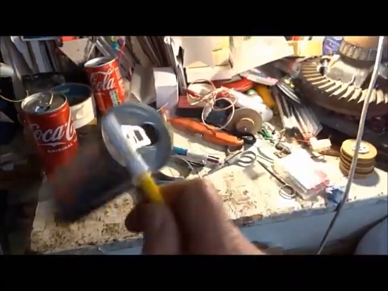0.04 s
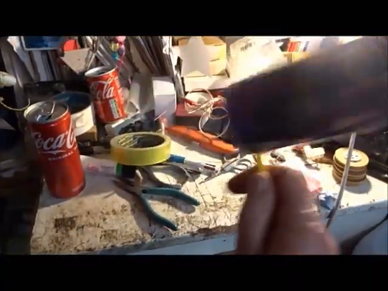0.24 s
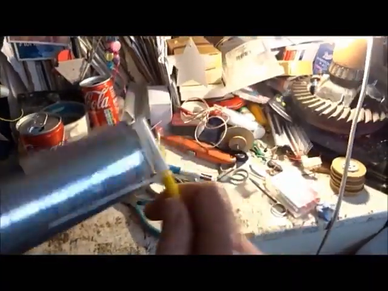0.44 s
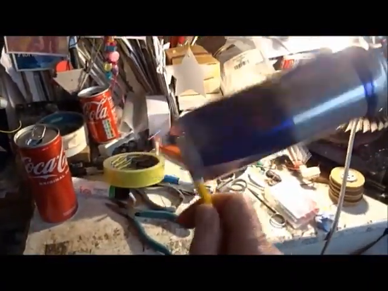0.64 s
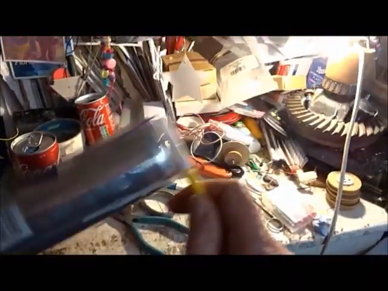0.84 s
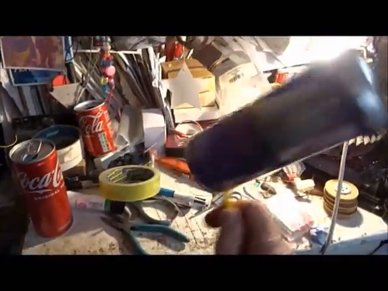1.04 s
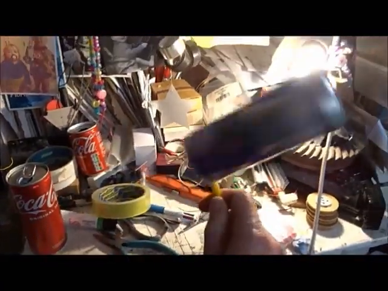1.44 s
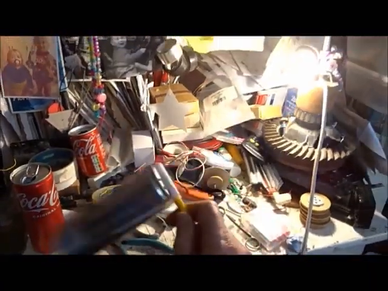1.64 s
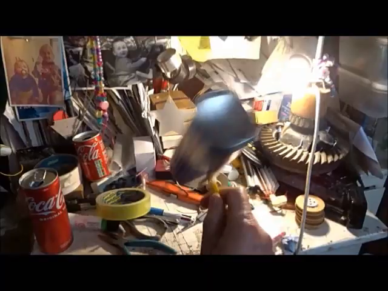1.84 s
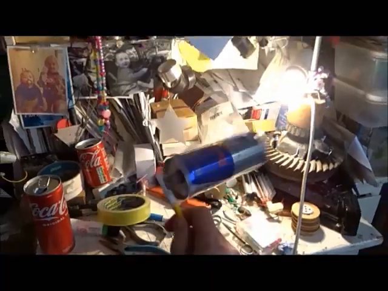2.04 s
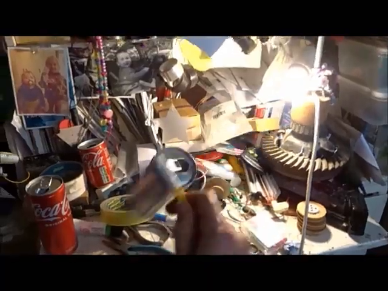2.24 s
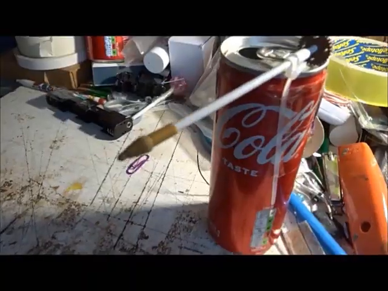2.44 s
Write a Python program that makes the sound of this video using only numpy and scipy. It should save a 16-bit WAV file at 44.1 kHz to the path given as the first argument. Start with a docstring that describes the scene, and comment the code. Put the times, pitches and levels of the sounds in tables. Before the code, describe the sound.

Rapid metallic clicking and rattling from an empty can whirled on a stick, close up.

```python
"""A faint workshop hiss, then a fast, tinny clatter: an empty drink can whirls on a stick over a bench.
The stick catches and slips at the can's tab about twenty times a second. Each slip is a snap, a short
chatter of contacts that sets the thin wall ringing and the air inside humming. The microphone is close,
so a limiter turns down the loud snaps. The sound is cut off while the can still spins."""
import sys
import numpy as np
from scipy import signal
from scipy.fft import rfft, irfft
from scipy.io import wavfile
from scipy.ndimage import uniform_filter1d, minimum_filter1d

SR = 44100
rng = np.random.default_rng(int(sys.argv[2]) if len(sys.argv) > 2 else 0)


def transcribe(signal):
    """Save signal, clipped to [-1, 1], as a 16-bit WAV file at the path in sys.argv[1]."""
    frames = np.atleast_2d(signal).T
    limited = np.clip(frames, -1, 1)
    pcm = np.round(limited * 32767).astype(np.int16)
    wavfile.write(sys.argv[1], SR, pcm)


N = 114660
TIME = np.arange(N) / SR
RING = 16384   # samples in the sound of one slip
AGE = np.arange(RING) / SR   # seconds since the slip
HZ = np.maximum(np.fft.rfftfreq(RING, 1 / SR), 1)


def from_db(db):
    """Turn decibels into a number to multiply by."""
    return 10 ** (np.asarray(db) / 20)


def at_hz(points, hz):
    """Read between a table's rows, giving every octave the same room."""
    f, value = np.transpose(points)
    return np.interp(np.log(hz), np.log(f), value)


def causal(gain):
    """A filter with these gains that makes no sound before it is struck (minimum phase)."""
    cepstrum = irfft(np.log(gain))
    cepstrum[1:RING // 2] *= 2
    cepstrum[RING // 2 + 1:] = 0
    return np.exp(rfft(cepstrum))


# The tone of the room's hiss. Each row: frequency in Hz, level in dB.
HISS_TONE = [(60, -36), (500, -17), (850, -12.5), (1480, -14), (1700, -1), (2000, -14), (3000, -21),
             (15000, -31)]

def workshop(level_db=-61):
    """Faint, steady hiss with a nasal middle."""
    shape = from_db(at_hz(HISS_TONE, np.maximum(np.fft.rfftfreq(N, 1 / SR), 1)))
    noise = irfft(rfft(rng.standard_normal((2, N))) * shape, N)
    return from_db(level_db) * noise / noise.std()


def swing(t, share, turns_per_s=2.4):
    """A shift in time that bends a pitch up and down by a small share, once a turn."""
    speed = 2 * np.pi * turns_per_s
    return share * np.sin(speed * t) / speed


def low_tones(strikes, tones, levels, jolt_rad):
    """All but the faintest slips top up the low tones and jolt their waves out of step."""
    out = np.zeros(N)
    kicks = 1.0 * (strikes > strikes.max() / 20)
    smooth = signal.butter(2, 70, fs=SR, output="sos")
    swung_time = TIME + swing(TIME, share=.009)
    for hz, db, ring_s in tones:
        swell = signal.lfilter([1], [1, -from_db(-60 / (ring_s * SR))], kicks + 1e-18)
        swell = swell ** .62   # evens out the slips and stretches the fade
        phase = np.cumsum(kicks * rng.normal(0, jolt_rad, N))
        envelope = signal.sosfilt(smooth, swell * np.exp(1j * phase))
        out += from_db(db) * np.real(envelope * np.exp(2j * np.pi * hz * swung_time))
    return from_db(np.interp(TIME, *np.transpose(levels))) * out


# The can's two lowest tones. Each row: pitch in Hz, level in dB, ring time in seconds before stretching.
HUM_TONES = [(335, -2, .33), (383, -6, .3)]
# The hum swells and sinks as the can swings. Each row: time in seconds, level in dB.
HUM_SWELLS = [(0.26, -56.5), (0.532, -46), (0.73, -52), (0.819, -48), (1.12, -56), (1.17, -71),
              (1.23, -52.5), (1.549, -58.5), (1.82, -52), (2.0, -59.5), (2.33, -58.5)]

def hum(strikes):
    """The air inside hums with two hollow tones that beat against each other."""
    return low_tones(strikes, HUM_TONES, HUM_SWELLS, jolt_rad=.8)


# The flexing wall's tones. Each row: pitch in Hz, level in dB, ring time in seconds before stretching.
FLEX_TONES = [(610, -12, .12), (1503, -7, .15), (1528, -1, .16)]
# Short swells of the flexing. Each row: time in seconds, level in dB.
FLEX_SWELLS = [(.25, -54), (.41, -42.5), (.56, -56.5), (.73, -57.5), (.81, -41.5), (.87, -58), (0.951, -47),
               (1.13, -65.5), (1.219, -52), (1.4, -57.5), (1.521, -75.5), (2.03, -69), (2.259, -57)]

def flex(strikes):
    """The wall flexes slowly, giving one lower tone and a beating pair."""
    return low_tones(strikes, FLEX_TONES, FLEX_SWELLS, jolt_rad=1.8)


def tint(hz, body_db, treble_db):
    """One slip's own tone: more or less body (2200 to 4800 Hz) and treble (from 8000 Hz up)."""
    corners_hz = [900, 2200, 4800, 5400, 7200, 8000]
    return from_db(np.interp(hz, corners_hz, [0, body_db, body_db, 0, 0, treble_db]))


def treble_bumps(width_hz=90, depth_db=3.8):
    """Narrow peaks and dips in the treble: every slip favours other weak tones of the wall."""
    size = int(width_hz * RING / SR)
    bumps = uniform_filter1d(uniform_filter1d(rng.standard_normal(len(HZ)), size), size)
    gain = from_db(depth_db * bumps / bumps.std())
    gain /= np.sqrt(np.mean(gain ** 2))
    return gain ** np.clip(HZ / 3000, 0, 1)   # shallower towards the bass


# The wash of the wall's weak tones. Each row: frequency in Hz, level in dB.
SHIMMER_TONE = [(62, -43.5), (225, -39.5), (325, -24.5), (490, -33.5), (820, -53), (1130, -27), (1400, -42),
                (2460, -15.5), (3360, -17), (3910, -5.5), (4810, -9.5), (5610, 1), (6610, -1), (7710, -7),
                (9310, -6), (12000, -13.5), (15400, -23)]
# How long the wash rings. Each row: frequency in Hz, seconds to fade by 60 dB.
SHIMMER_FADES = [(210, 0.27), (1450, 0.35), (5500, 0.28), (14100, 0.24)]
# How wide it sounds. Each row: frequency in Hz, level of the sides against the middle in dB.
SHIMMER_WIDTH = [(500, -14), (2350, 2.5), (4250, -4.5), (7100, -13), (14100, -25)]

def shimmer(colour, level_db=-4):
    """Countless weak wall tones and bench echoes blur into a wash whose top fades first."""
    shape = from_db(at_hz(SHIMMER_TONE, HZ))
    shape = from_db(level_db) * shape / np.sqrt(np.mean(shape ** 2))
    mid, side = rfft(rng.standard_normal((2, RING))) * shape * colour
    side *= from_db(at_hz(SHIMMER_WIDTH, HZ))
    ears = np.array([mid + side, mid - side])
    centres_hz, fades_s = np.transpose(SHIMMER_FADES)
    out = 0
    for one_band, fade_s in zip(np.eye(len(fades_s)), fades_s):
        band = np.interp(np.log(HZ), np.log(centres_hz), one_band)
        out += irfft(ears * band) * from_db(-60 * AGE / fade_s)
    return out


# The wall's clear tones. Each row: pitch in Hz, level in dB, seconds to fade by 60 dB.
WALL_TONES = [(2834.5, -15.5, 0.17), (3827, -17.5, 0.16), (4007, -19, 0.15), (4247, -17.5, 0.13),
              (4910, -23, 0.13), (5610, -9.5, 0.12), (6573, -4, 0.2), (6670, -14.5, 0.3),
              (6800, -18.5, 0.12), (7820, -17, 0.21), (9464, -18, 0.19), (11030, -20, 0.25)]
# The first tone comes and goes as the can turns. Each row: time in seconds, extra level in dB.
FIRST_TONE_SWELLS = [(.42, -15), (.49, 2), (.68, 3.5), (.85, -6.5), (1.03, 5), (1.14, -14), (1.21, 6),
                     (1.29, 0.5), (1.52, 9.5), (1.69, 4.5), (1.74, -2.5), (2.18, -9), (2.25, -0.5)]

def wall(start_s, body_db, treble_db, level_db=-1.5, scatter_db=4.5, pan_db=5.5):
    """A slip strikes the wall's clear tones, each from a random side; the swing bends their pitch."""
    hz, db, fade_s = np.transpose(WALL_TONES)
    size, pan, phase = rng.normal(0, 1, (3, len(hz)))
    extra_db = scatter_db * size
    extra_db[0] = np.interp(start_s, *np.transpose(FIRST_TONE_SWELLS))
    heard_age = AGE + swing(start_s + AGE, share=.003)   # Doppler effect
    waves = np.sin(2 * np.pi * (hz[:, None] * heard_age + phase[:, None]))
    waves *= from_db(-60 * AGE / fade_s[:, None])
    gains = from_db(level_db + db + extra_db + pan_db * pan * np.array([[-.5], [.5]]))
    return gains * tint(hz, body_db, treble_db) @ waves


# The pitches at which the lid rings. Each row: pitch in Hz, width of the peak in Hz, level in dB.
LID_PEAKS = [(1130, 180, 3), (2420, 130, 4), (4290, 100, 2), (5300, 200, -2), (5670, 140, 7),
             (6570, 130, 12), (6850, 110, 10), (7280, 140, 2), (9470, 220, -2), (10900, 240, -1)]

def lid(level_db=-1, scatter_db=2.2, pan_db=2.5):
    """The ringing lid as a filter for each ear; every slip weights its peaks differently."""
    delay, out = np.exp(-2j * np.pi * HZ / SR), 0   # a delay of one sample
    for hz, width_hz, db in LID_PEAKS:
        decay = np.exp(-np.pi * width_hz / SR)
        gain = from_db(db + scatter_db * rng.normal() + pan_db * rng.normal() * np.array([[-.5], [.5]]))
        feedback = 1 - 2 * decay * np.cos(2 * np.pi * hz / SR) * delay + (decay * delay) ** 2
        out += gain * (1 - decay ** 2) / 2 * (1 - delay ** 2) / feedback
    return from_db(level_db) * out


# The tone of one contact between stick and tab. Each row: frequency in Hz, level in dB.
CONTACT_TONE = [(62, -47), (600, -42.5), (1500, -40), (2200, -22.5), (3350, -20), (4250, -15.5), (5250, -8),
                (6650, 0), (7750, -7.5), (9350, -6.5), (10200, -15), (15400, -21)]

def snap(colour, contacts_per_s=1000, hold_s=.0045, dying_s=.003, scrape_s=.0004, scatter_db=1.8):
    """The stick slips: a dying chatter of tiny scrapes rings the lid."""
    jitter, size = rng.normal(0, 1, (2, 40))
    when = np.append(0, np.cumsum(np.exp(.35 * jitter[1:]))) / contacts_per_s
    force = np.exp(-np.maximum(when - hold_s, 0) / dying_s) * from_db(scatter_db * size)
    force[0] = 1.4   # a firm first contact
    contacts = np.bincount((when * SR).astype(int), force, RING)
    envelope = signal.lfilter([1], [1, -np.exp(-1 / (scrape_s * SR))], contacts + 1e-18)
    scrapes = envelope * rng.standard_normal(RING)
    spectrum = rfft(scrapes) * causal(from_db(at_hz(CONTACT_TONE, HZ))) * (1 + lid())
    loudest_band = irfft(spectrum.mean(axis=0) * (HZ > 5200) * (HZ < 7500))
    strength = np.sqrt(np.sum(loudest_band ** 2) / (.01 * SR))
    return irfft(spectrum * causal(colour)) / strength


# The slips of the stick. Each row: start in seconds, snap level in dB, ring level in dB,
# extra body in dB, extra treble in dB.
SLIPS = [(0.1666, -44, -59.5, 18, 3.5), (0.233, -47, -52.5, 20.5, 5), (0.2447, -17.5, -20, 1, 2.2),
         (0.2862, -18, -18, -2, -1.5), (0.3245, -15.5, -16, -5.5, -4.5), (0.3561, 0.5, -15.5, -1, -4),
         (0.3868, -10, -16.5, -0.5, -0.5), (0.4171, -11, -16, -9, -5), (0.4434, -4, -18.5, -1.5, -6),
         (0.4732, -13, -15.5, 2, -2.5), (0.5028, -10.5, -19, 6.5, 1.2), (0.54, -2.5, -20, -3.5, -1.5),
         (0.5892, -6.5, -21.5, 5, 4), (0.6464, -12.5, -21.5, -1.5, -1.5), (0.7107, -10, -19.5, -3.5, -2),
         (0.764, -4.5, -15, -2.8, -4), (0.803, -15, -16, -1, -3), (0.8437, -7.5, -21, 4, 1),
         (0.8832, -15, -19, 5, 1), (0.9254, -6, -21.5, 4, 1), (0.9754, -6.5, -21.5, 2.5, -1),
         (1.0269, -11, -22, 1.3, 1.5), (1.0837, -17, -22, 0.2, -2), (1.1535, -13.5, -21.5, -1.5, -3),
         (1.2034, -14.5, -19, -0.8, -0.5), (1.2517, -18.5, -20.5, -1.5, -0.8), (1.2971, -15, -21, -2.5, -2),
         (1.3359, -16.5, -20, 2.5, 2.5), (1.373, -9.5, -24, 2.5, 3), (1.416, -8.5, -21, -1, 0.5),
         (1.4556, -14.5, -20, -3.5, 0.8), (1.4993, -11.5, -21, -2.5, -1.5), (1.5558, -11, -22.5, 1, -2),
         (1.6021, -14, -19.5, 0, 0.5), (1.6441, -16, -19, -1.5, 0), (1.6832, -18, -20, 2.5, -1),
         (1.7202, -20, -19, -5.9, 0), (1.7575, -12, -25, 4.1, 2.7), (1.804, -12, -21.5, 0.8, -0.4),
         (1.8706, -13.5, -24, 2, 3.5), (1.9476, -10.5, -23, -1.5, -2.5), (2.0514, -14, -23, -0.6, 1),
         (2.1264, -14, -22, -2.3, 0), (2.1893, -14, -20, 0, 0), (2.2457, -22.5, -21, 2.5, 1.4),
         (2.2965, -13, -23.5, 2, 3.4)]

def can(snap_trim_db=-4, rise_s=.0011, dip_s=.004, dip_db=-5, left_db=-1, left_lag_s=9e-6):
    """The whirling can snaps, rings and hums with the slips, a little right of centre."""
    out, strikes = np.zeros((2, N)), np.zeros(N)
    attack = 1 - np.exp(-(AGE / rise_s) ** 2)   # the wall takes up the chatter
    next_starts = [row[0] for row in SLIPS[1:]] + [N / SR]
    for (start_s, snap_db, ring_db, body_db, treble_db), next_s in zip(SLIPS, next_starts):
        # The ringing dips just before the next snap, keeping the ticks crisp.
        dip = from_db(np.interp(start_s + AGE, [next_s - dip_s, next_s - dip_s / 2], [0, dip_db]))
        colour = tint(HZ, body_db, treble_db) * treble_bumps()
        ring = attack * dip * (wall(start_s, body_db, treble_db) + shimmer(colour))
        slip = from_db(snap_trim_db + snap_db) * snap(colour) + from_db(ring_db) * ring
        start = int(start_s * SR)
        out[:, start:start + RING] += slip[:, :N - start]
        strikes[start] = from_db(ring_db)
    left, right = out + hum(strikes) + flex(strikes)
    lag = np.exp(-2j * np.pi * np.fft.rfftfreq(N, 1 / SR) * left_lag_s)
    return np.array([from_db(left_db) * irfft(rfft(left) * lag, N), right])


def scene():
    """The can over the room's hiss."""
    return can() + workshop()


# The overall volume: a steady boost, then the sudden cut. Each row: time in seconds, gain in dB.
VOLUME = [(2.3434, 4), (2.3435, -9), (2.368, -18), (2.409, -100)]

def record(dry, threshold=.55, ahead_s=.002, recovery_db_per_s=1100, top_hz=16300):
    """A limiter ducks just ahead of loud peaks; then the volume is set and the highest treble removed."""
    ahead = int(ahead_s * SR)
    over_db = np.maximum(20 * np.log10(abs(dry).max(axis=0) / threshold + 1e-9), 0)
    recovery_db = recovery_db_per_s * TIME
    held_db = np.maximum.accumulate(over_db + recovery_db) - recovery_db
    duck_db = uniform_filter1d(minimum_filter1d(-held_db, size=ahead + 1), size=ahead)
    volume_db = np.interp(TIME, *np.transpose(VOLUME))
    top_cut = signal.cheby2(16, 50, top_hz, fs=SR, output="sos")
    return signal.sosfiltfilt(top_cut, dry * from_db(duck_db + volume_db))


dry = scene()
out = record(dry)
transcribe(out)
```